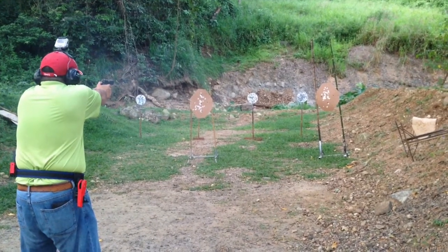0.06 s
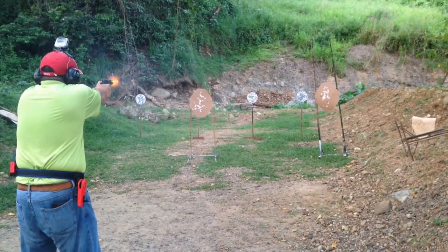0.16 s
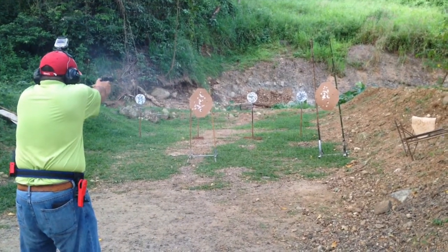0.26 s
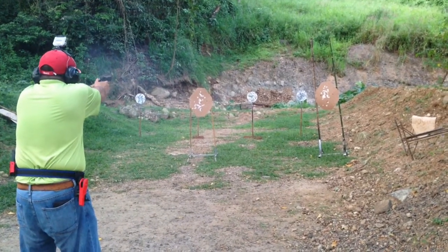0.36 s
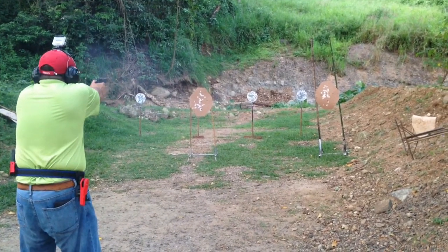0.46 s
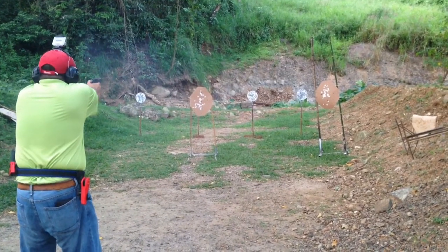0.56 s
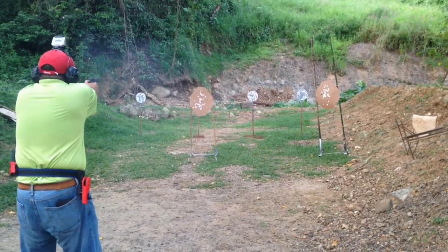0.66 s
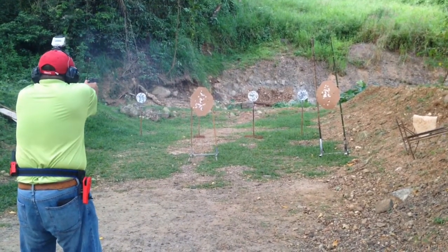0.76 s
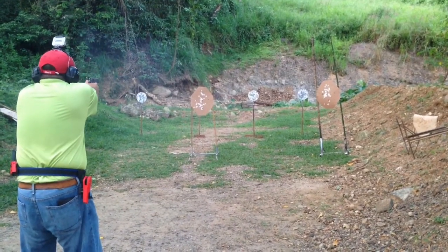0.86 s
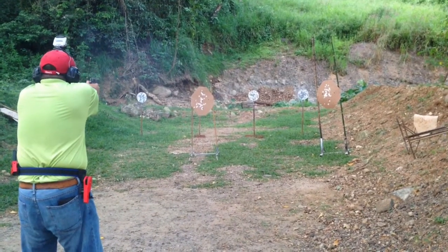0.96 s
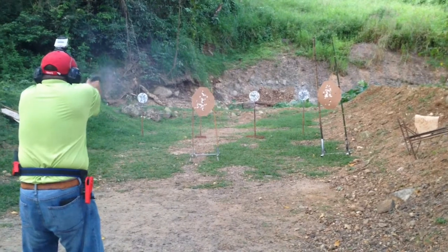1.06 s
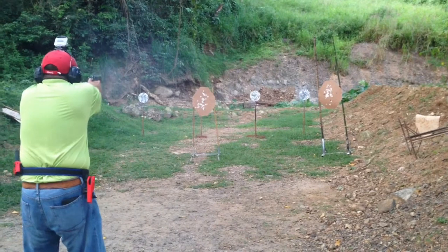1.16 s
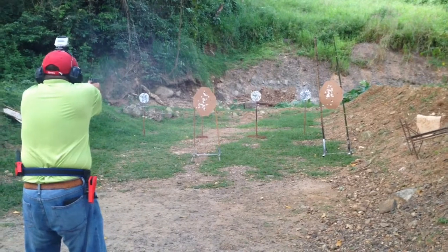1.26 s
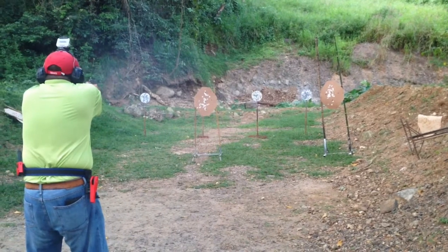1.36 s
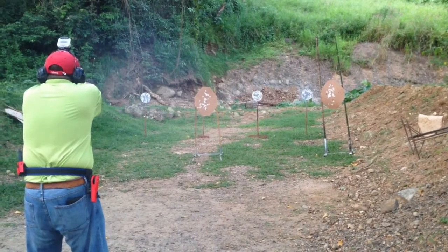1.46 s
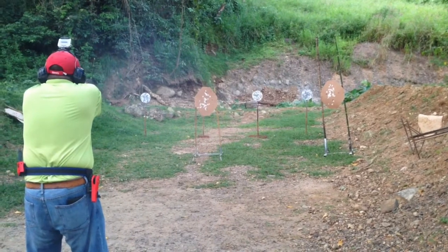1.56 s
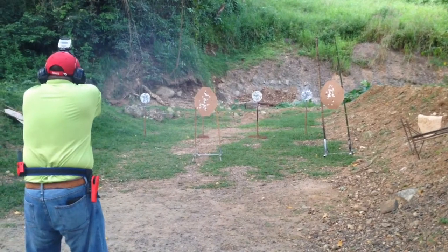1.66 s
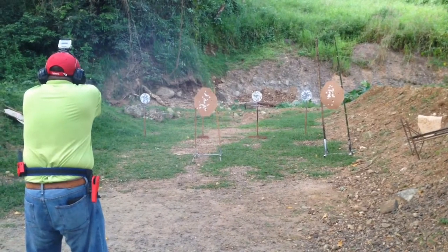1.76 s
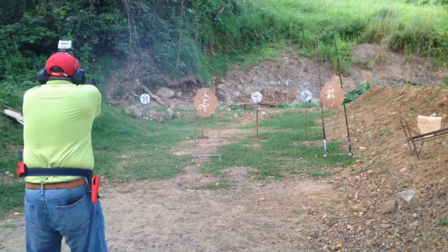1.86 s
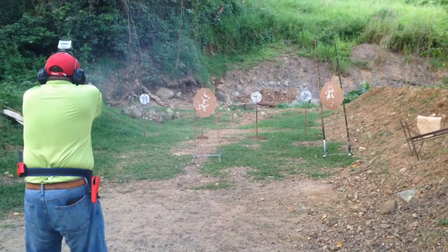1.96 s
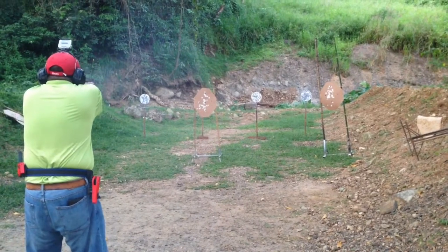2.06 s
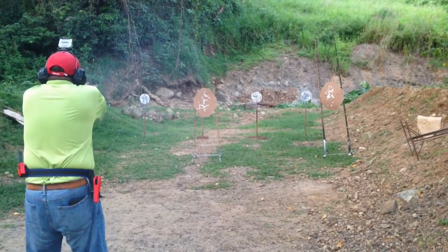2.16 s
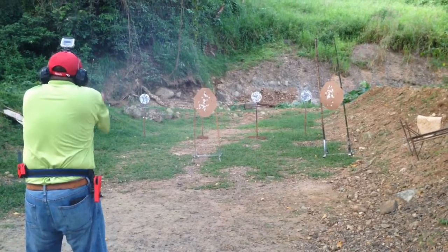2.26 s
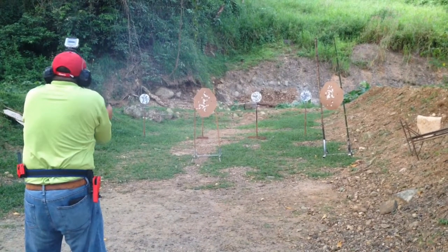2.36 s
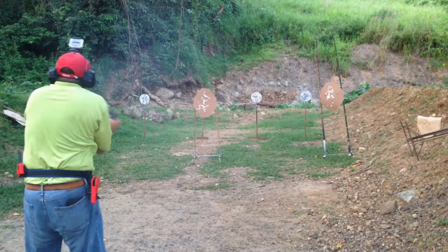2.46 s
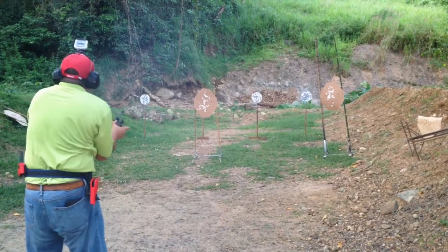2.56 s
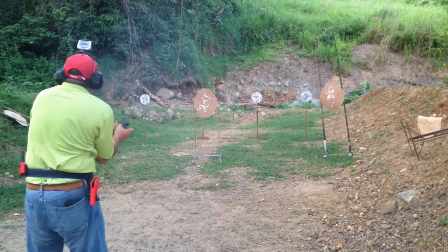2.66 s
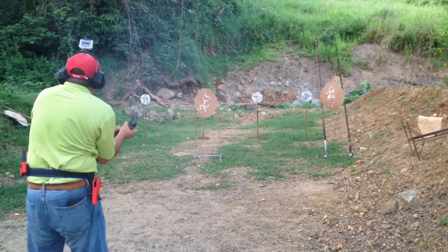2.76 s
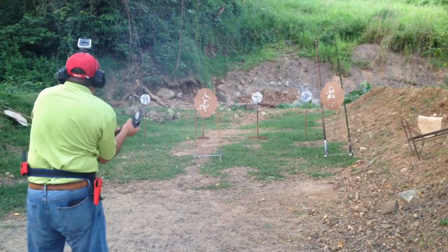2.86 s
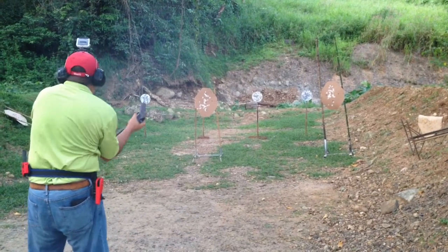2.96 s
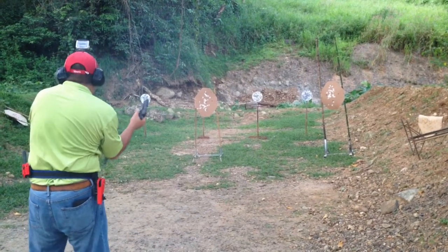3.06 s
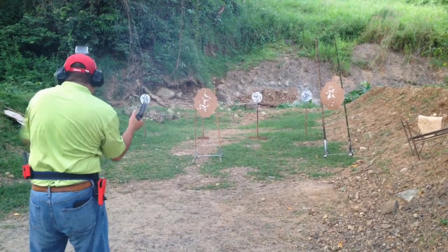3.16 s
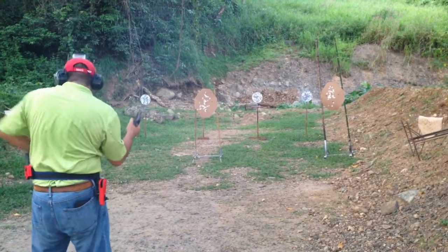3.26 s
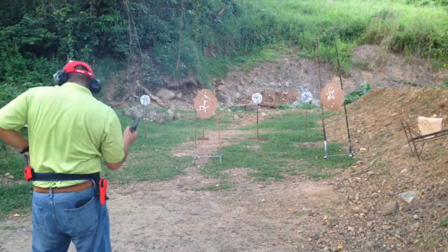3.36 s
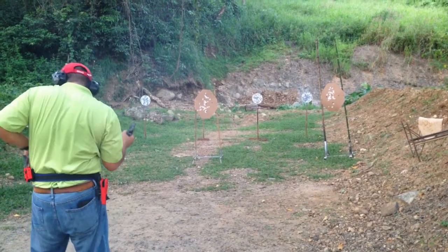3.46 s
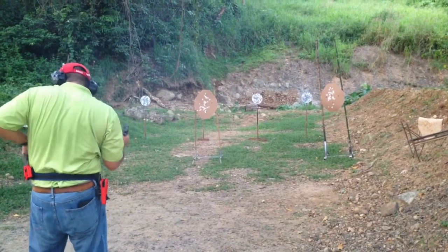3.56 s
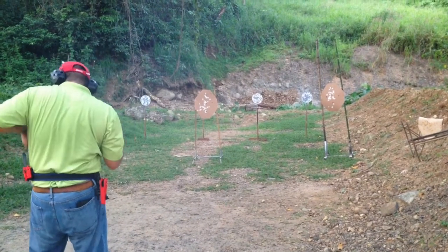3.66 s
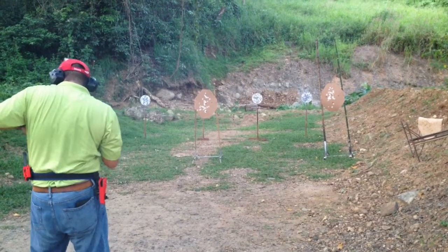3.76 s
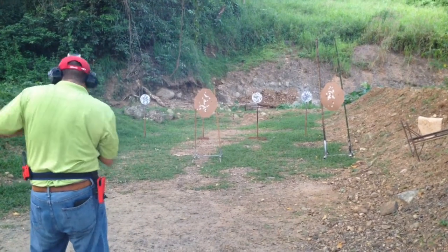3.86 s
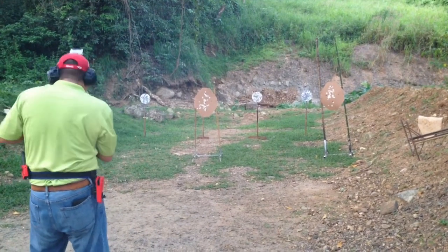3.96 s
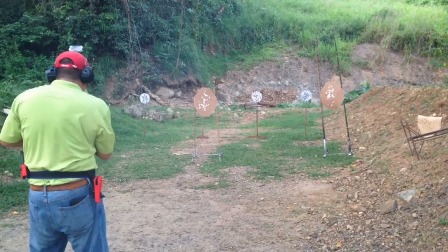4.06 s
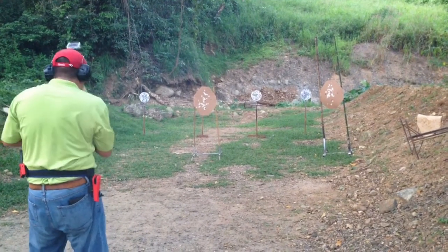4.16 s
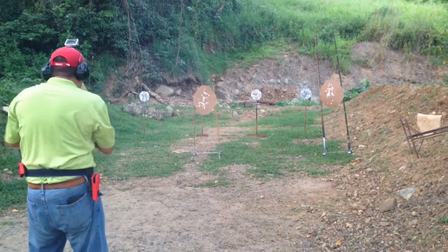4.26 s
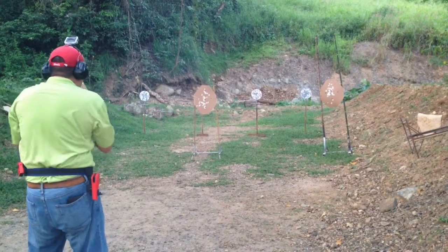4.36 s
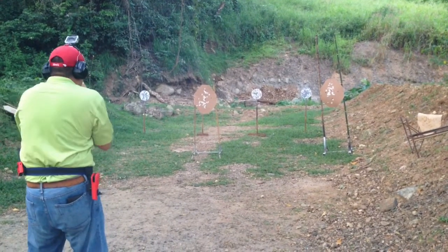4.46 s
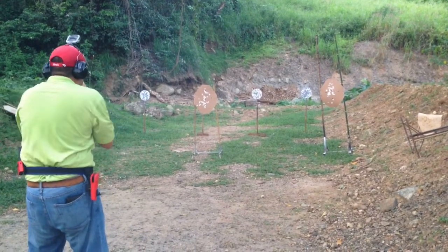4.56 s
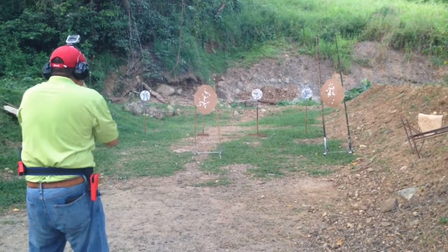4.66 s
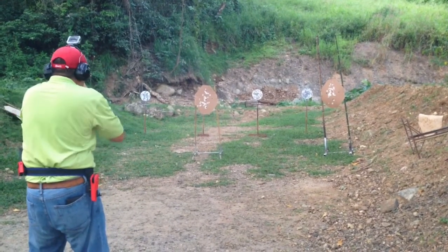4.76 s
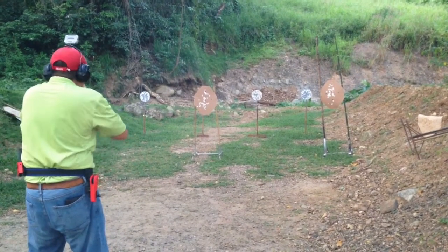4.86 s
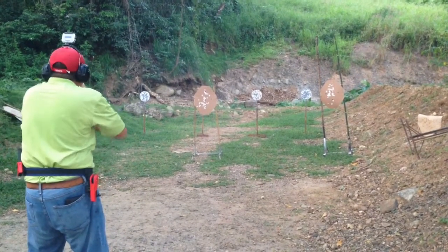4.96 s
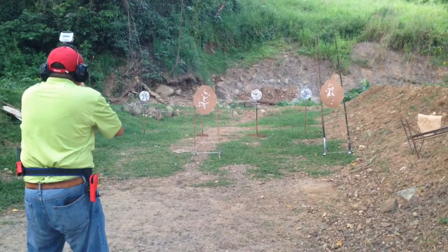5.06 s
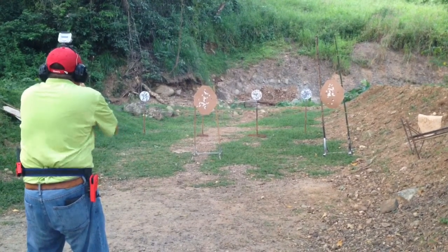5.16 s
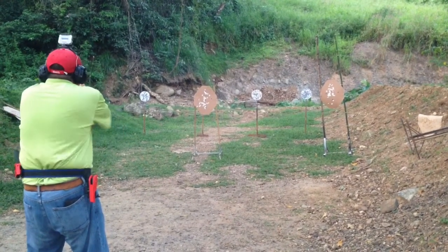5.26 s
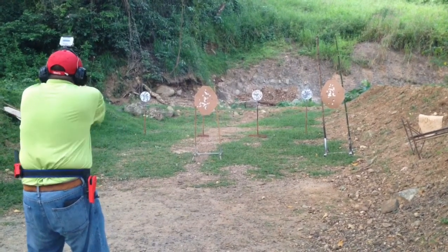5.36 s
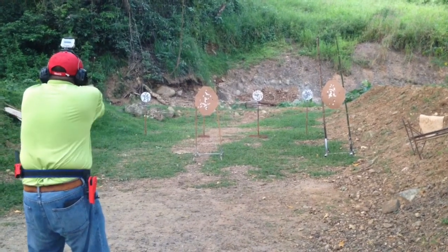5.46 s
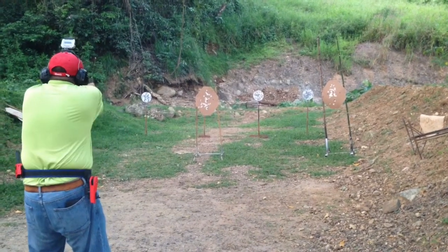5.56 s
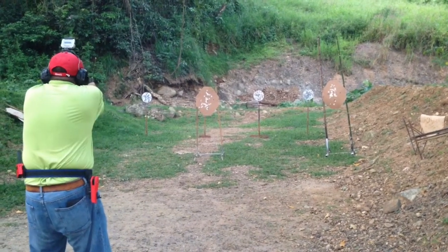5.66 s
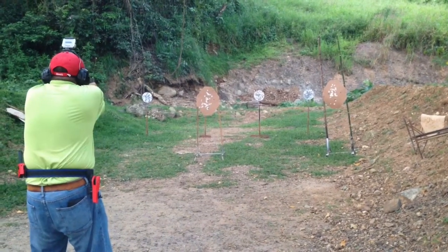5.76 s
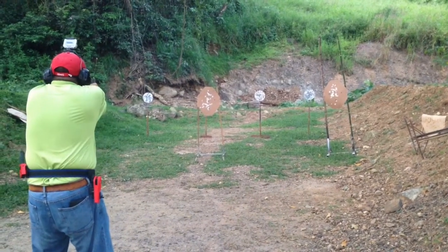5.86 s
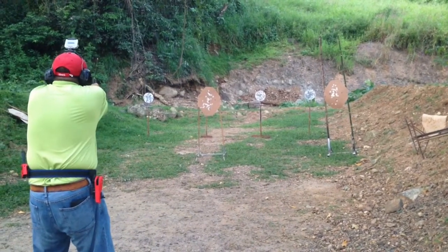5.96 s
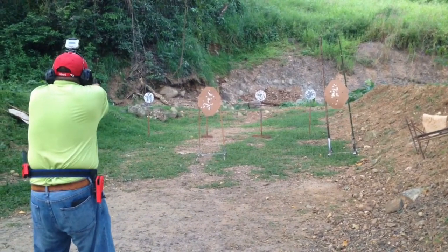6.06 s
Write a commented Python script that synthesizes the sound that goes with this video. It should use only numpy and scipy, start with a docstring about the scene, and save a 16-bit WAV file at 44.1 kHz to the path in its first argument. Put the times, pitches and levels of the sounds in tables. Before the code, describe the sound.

The fading echo of an earlier shot opens the scene, with a tiny brass tick at 0.16 s. Close, very loud pistol blasts crack at 0.24, 1.07 and 1.99 s, each followed by a dense, lumpy roll from earth banks and trees, dying over about a second. A bullet smacks a steel plate at 1.14 s, leaving a high ring; a case ticks at 1.89 s and a dull earth thud lands at 2.17 s. A very faint ricochet whine falls around 2.6 s. Cases tick and rustle on gravel from 2.83 to 3.05 s. A sharp clack at 3.46 s releases the magazine, which bounces lightly until 3.8 s. Soft handling clicks from 4.07 s lead to a firm clack at 4.48, another at 5.02, and the slide's metallic snap around 5.15 s. Background rumble, hiss and thin insect drone, ducked by shots, gradually return with paired cricket chirps until the end at about 6 s.

```python
"""An earth-banked shooting range among trees: three pistol shots at steel plates, and the tail of an earlier one.
Blasts are N-waves with noise cracks; band-filtered noise and pulse echoes form the long, lumpy answer of the banks.
Struck steel and brass are decaying sine modes, handling and landings are noise bursts, and thuds are smooth pulses.
Below lie a ricochet's falling sine, a rustle of rolling cases, paired cricket pulses and a filtered-noise background
of far rumble, hiss and insect drone, which sinks at each shot and comes back."""
import sys
import numpy as np
from scipy import signal
from scipy.io import wavfile

SR = 44100
rng = np.random.default_rng(int(sys.argv[2]) if len(sys.argv) > 2 else 0)


def nominal_scale(level):
    """Amplitude ratio for a level in decibels (scalar or array-like)."""
    x = np.asarray(level, float) / 20
    return 10 ** x


def int16_out(signal):
    """Quantize to a 16-bit WAV file."""
    q = np.round(np.clip(np.atleast_2d(signal).T, -1, 1) * 32767)
    wavfile.write(sys.argv[1], SR, q.astype(np.int16))


N = 269892


def at_hz(points, hz):
    """Spectral interpolation: every column of a table, read on a logarithmic frequency axis."""
    points = np.array(points, float)
    return [np.interp(np.log(hz), np.log(points[:, 0]), column) for column in points.T[1:]]


def bands():
    """Constant-percentage-bandwidth analysis: third-octave filters, each with its centre/Hz."""
    edges = 22 * 2 ** np.arange(0, 30 / 3, 1 / 3)
    for low, high in zip(edges, edges[1:]):
        yield np.sqrt(low * high), signal.butter(2, [low, high], "band", fs=SR, output="sos")


def coloured(spectrum, length):
    """Spectral shaping: weighted bands of white noise add up to noise of rms 1."""
    settle = 8000   # samples for the filters to settle
    white = rng.standard_normal((2, length + settle))
    out = np.zeros(length + settle)
    for k, (hz, sos) in enumerate(bands()):
        # neighbouring bands take independent noise
        out += nominal_scale(at_hz(spectrum, hz)[0]) * signal.sosfilt(sos, white[k % 2])
    out = out[settle:]
    return out / out.std()


def ring(clicks, hz, t60):
    """Damped resonance: a two-pole filter answers a unit click with a decaying sine of initial height 1."""
    radius, angle = nominal_scale(-60 / (t60 * SR)), 2 * np.pi * hz / SR
    denominator = [1, -2 * radius * np.cos(angle), radius * radius]
    return signal.lfilter([0, np.sin(angle)], denominator, clicks + 1e-18)


def add(out, s, sound):
    """Superposition: a sound is added at time s, cut at both ends of the output."""
    i = round(s * SR)
    piece = sound[max(-i, 0):len(out) - i]
    out[max(i, 0):max(i, 0) + len(piece)] += piece


def struck(times, levels_db, modes, spread_db):
    """Modal excitation: each blow drives every mode, with a random strength where spread_db is not zero."""
    out = np.zeros(N)
    chance = rng.normal(0, spread_db, (len(times), len(modes)))
    for k, (hz, level_db, t60) in enumerate(modes):
        clicks = np.zeros(N)
        clicks[np.round(times * SR).astype(int)] = nominal_scale(levels_db + level_db + chance[:, k])
        out += ring(clicks, hz, t60)
    return out


def burst(t60, spectrum):
    """Impact noise: uneven coloured noise under an exponential decay, with a peak of about 1."""
    t = np.arange(round(.12 * SR)) / SR
    steps = rng.standard_normal(len(t) // 60 + 1)
    uneven = nominal_scale(2.6 * np.repeat(steps, 60)[:len(t)])
    onset = np.minimum(t / 0.001, 1)
    return 0.46 * coloured(spectrum, len(t)) * uneven * nominal_scale(-60 * t / t60) * onset


def thump(hz, cycles):
    """Band-limited pressure pulse: a few cycles of a sine under a smooth hump."""
    t = np.arange(round(cycles * SR / hz)) / SR
    return np.hanning(len(t)) * np.sin(2 * np.pi * hz * t)


# Pistol shots, the first before the start: [t/s, echo level/dB, blast peak level/dB]
SHOTS = [(-.6, -1.5, -9), (0.2417, -0.5, -10.5), (1.068, 0, -14.5), (1.994, 0, -9.5)]


def shots(answers):
    """Muzzle blast: an N-wave and a bright crack, the crack reflected once by the ground, then the range."""
    out = np.zeros(N)
    blast = np.linspace(1, -1, round(0.00082 * SR))
    crack_spectrum = [(1000, -13.5), (3500, 3.5), (7000, -2), (15000, -9.5)]
    for (s, level_db, blast_db), answer in zip(SHOTS, answers):
        add(out, s, nominal_scale(level_db) * answer)
        add(out, s, nominal_scale(blast_db) * blast)
        for lag, crack_db in ((0, -2), (.0045, -4)):
            add(out, s + lag, nominal_scale(crack_db) * burst(0.013, crack_spectrum))
    return out


# Scatter from the range, before colouring: [delay t/s, level/dB per Hz, bass level/dB over it]
SCATTER = [(0.0, -53, -7), (0.003, -51, 10), (0.012, -52.5, -17), (0.03, -49, -10), (0.059, -51.5, -28),
           (0.075, -57, -22), (0.1, -58, 0), (0.155, -54, -2), (0.2, -57, -9), (0.25, -59.5, -9.5),
           (0.33, -62, -4), (0.46, -69, -9), (0.55, -71, -3), (0.8, -80, 0), (1.4, -97, 9.5)]
# How far each pitch follows bass and treble: [f/Hz, bass share, treble share, own level/dB]
COLOUR = [(59.34, 1.1, 0.17, -16.5), (151, 1.5, 0, -5.5), (411, 0.76, 0, 4), (850, 0, 0, 3),
          (2570, 0.085, 0.51, 1), (5980, 0.062, 0.88, -1), (11500, 0.18, 1.216, -6.5), (15500, 0, 1.5, -16)]
TAIL_DB_PER_S = 30   # decay beyond the last scatter point
# leaves scatter the treble, which dies evenly; nearby leaves add a brighter start
TREBLE_DB, TREBLE_DB_PER_S, TREBLE_MOST_UNDER_DB = -56.5, 66, 24
TREBLE_EARLY_DB, TREBLE_EARLY_S = 5.0, 0.05


def range_answer(lumpy_db):
    """Diffuse scattering: fixed ground gives each shot shared noise, while stirred air renews the treble."""
    delay, level_db, bass_db = np.transpose(SCATTER)
    t = np.arange(round(1.8 * SR)) / SR
    level = np.interp(t, delay, level_db) - TAIL_DB_PER_S * np.maximum(t - delay[-1], 0)
    lows = np.interp(t, delay, bass_db)
    treble_db = TREBLE_DB - TREBLE_DB_PER_S * t + TREBLE_EARLY_DB * np.exp(-t / TREBLE_EARLY_S)
    highs = np.maximum(treble_db - level, -TREBLE_MOST_UNDER_DB)
    settle = 4000   # samples for the filters to settle
    ground = rng.standard_normal((2, len(t) + settle))
    stirred = rng.standard_normal((2, len(SHOTS), len(t) + settle))
    lumps = rng.standard_normal((40, len(t) // 400 + 2))
    out = np.zeros((len(SHOTS), len(t)))
    unit = np.sqrt(SR / 2)   # brings white noise to 0 dB per Hz
    for k, (hz, sos) in enumerate(bands()):
        bass, treble, own_db = at_hz(COLOUR, hz)
        fresh = np.clip(hz / 4000, .3, 1)
        mixed = np.sqrt(1 - fresh ** 2) * ground[k % 2] + fresh * stirred[k % 2]
        noise = signal.sosfilt(sos, mixed)[:, settle:]
        # three neighbouring bands share their lumps
        lump = np.interp(np.arange(len(t)) / 400, np.arange(lumps.shape[1]), lumps[k // 3])
        out += unit * noise * nominal_scale(level + bass * lows + treble * highs + own_db + lumpy_db * lump)
    return out + faces(len(t), count=24)


# Clearest faces of bank and trees, the same for every shot: [delay t/s, f/Hz, peak level/dB]
ECHOES = [(0.0195, 1280, -17), (0.0381, 1300, -12), (0.0395, 850, -16), (0.0599, 850, -20),
          (0.0603, 1300, -9.5), (0.1234, 1300, -17.5), (0.1297, 544, -17.5), (0.1465, 330, -22),
          (0.1755, 220, -27), (0.1969, 570, -23), (0.204, 222, -26), (0.212, 564, -23), (0.264, 554, -23.5),
          (0.2825, 347, -27), (0.3324, 600, -27), (0.362, 200, -30), (0.4136, 500, -31), (0.4247, 340, -30),
          (0.4925, 350, -35), (0.5243, 550, -28.5), (0.5692, 850, -27), (0.5732, 1310, -31),
          (0.5732, 347, -35)]
# lesser faces at random: delays, pitches, then peak level at no delay, loss and half-range
FACE_FIRST_S, FACE_LAST_S, FACE_LOW_HZ, FACE_HIGH_HZ = 0.14, 0.8, 300, 1200
FACE_DB, FACE_DB_PER_S, FACE_SPREAD_DB = -22, 33, 3.5


def faces(length, count):
    """Discrete reflection: each face returns one dull pulse; the lesser ones weaken with delay."""
    where, pitch, size = rng.random((count, 3)).T
    delays = FACE_FIRST_S + (FACE_LAST_S - FACE_FIRST_S) * where
    pitches = FACE_LOW_HZ * (FACE_HIGH_HZ / FACE_LOW_HZ) ** pitch
    peaks = FACE_DB - FACE_DB_PER_S * delays + FACE_SPREAD_DB * (2 * size - 1)
    out = np.zeros(length)
    for s, hz, peak_db in [*ECHOES, *zip(delays, pitches, peaks)]:
        wave = nominal_scale(peak_db) * thump(hz, cycles=3.0 + hz / 300)
        add(out, s - len(wave) / SR / 2, wave)   # centred on its delay
    return out


# Bullets striking earth: [t/s, peak level/dB, f/Hz]
THUDS = [(2.166, -11, 210), (2.525, -34, 203.4), (3.091, -35, 303)]
# One bullet on a steel plate: [t/s, crack peak level/dB, ring level/dB]
PLATE_HIT = (1.1443, 5, -21)
# Modes of the plate: [f/Hz, level/dB relative to the ring level, t60/s]
PLATE = [(2097, -3, 0.75), (2077, -8, 0.4), (2160, -12, 1.0), (2320, -12, .8), (3467, -9, 0.5),
         (3537, -12, 0.4), (4457, -15, 0.5), (6099, -11, 0.5), (8565, -18, .4)]
PLATE_ECHO_DB = -8
# a tumbling bullet whines away
WHINE_S, WHINE_LENGTH_S = 2.52, 0.25
WHINE_HZ, WHINE_FALL_HZ_PER_S, WHINE_DB = 2480, 1400, -51


def bullets():
    """Impact radiation: modal ringing of a plate, pressure pulses in earth, and a ricochet's falling tone."""
    s, crack_db, ring_db = PLATE_HIT
    out = struck(np.array([s]), ring_db, PLATE, spread_db=0)
    out = out + nominal_scale(PLATE_ECHO_DB) * near_banks(out)
    crack_spectrum = [(120, -35), (600, -11), (2500, -9), (8000, -21.5), (15000, -32)]
    add(out, s, nominal_scale(crack_db) * burst(0.011, crack_spectrum))
    for s, peak_db, hz in THUDS:
        add(out, s, nominal_scale(peak_db) * thump(hz, cycles=3.16))
    t = np.arange(round(WHINE_LENGTH_S * SR)) / SR
    flutter = 1 + .5 * np.sin(2 * np.pi * 14 * t)
    whine = np.sin(2 * np.pi * np.cumsum(WHINE_HZ - WHINE_FALL_HZ_PER_S * t) / SR)
    add(out, WHINE_S, nominal_scale(WHINE_DB) * np.hanning(len(t)) * flutter * whine)
    return out


# Contacts of magazine and slide: [t/s, clatter level/dB, main f/Hz,
# treble tilt/dB per octave above 3 kHz, bass tilt/dB per octave below 3 kHz]
HANDLING = [(3.455, -17, 2040, 4, -3), (3.464, -9, 2200, -2, -6), (3.466, -16, 3700, -6, -4),
            (4.067, -36, 3105, -10, 2), (4.078, -33, 3230, -15, -.5), (4.124, -42, 3550, -6, 7),
            (4.197, -45, 1760, -10, 11), (4.234, -48, 2500, -2.5, -2), (4.448, -25, 2740, -9.5, 1),
            (4.476, -20.5, 3410, -2.5, -.5), (4.485, -12, 2340, -2.5, 2.5), (4.646, -46, 2357, -10, 5),
            (4.977, -40.5, 2035, -10.5, 1), (4.99, -27, 2400, -1, -3), (5.02, -8.5, 2500, -2, -1),
            (5.141, -24.5, 2320, -7, -2), (5.15, -17, 4790, 1.5, -4.5), (5.157, -16.5, 2430, -3.5, .5),
            (5.166, -13, 3820, 3, -2), (5.19, -28, 3700, 8.5, 1.5)]
# Clatter spectrum before tilting: [f/Hz, relative level/dB per Hz]
CLATTER = [(180, -47), (300, -17), (863, -15.5), (2100, -9.5), (3450, 1.5), (3690, 2), (4140, -7),
           (6790, -2), (15500, -9)]
# The slide rings as it shuts: [t/s, ring level/dB]
SLIDE_SLAM = (5.166, -33)
# Modes of the slide: [f/Hz, level/dB relative to the ring level, t60/s]
STEEL = [(2686, -10, 0.15), (3704, -4, 0.2), (5798, -8, 0.12), (6745, -6, 0.14), (9324, -10, 0.15),
         (10170, -10, 0.2), (10530, -8, 0.2), (10420, -9, .2), (11480, -10, 0.15)]
CLATTER_T60_S, CLATTER_S_PER_DB = 0.056, 0.0007   # harder contacts last longer
TONE_SHARE, TONE_T60_S = 0.4, 0.004


def handling():
    """Contact excitation: steel on steel and polymer gives tilted noise that drives one strong resonance."""
    s, level_db = SLIDE_SLAM
    out = struck(np.array([s]), level_db, STEEL, spread_db=0)
    hz_points, db_points = np.transpose(CLATTER)
    octaves = np.log2(hz_points / 3000)
    for s, peak_db, hz, treble_db, bass_db in HANDLING:
        tilt = treble_db * np.maximum(octaves, 0) + bass_db * np.maximum(-octaves, 0)
        t60 = np.clip(CLATTER_T60_S + CLATTER_S_PER_DB * peak_db, .005, .1)
        clatter = burst(t60, np.transpose([hz_points, db_points + tilt]))
        tone = ring(clatter, hz, TONE_T60_S)
        add(out, s, nominal_scale(peak_db) * (clatter + TONE_SHARE * tone / abs(tone).max()))
    return out


def drops(events, modes, t60, spectrum):
    """Impact of light metal: a broadband tick and unevenly driven modes."""
    s, peak_db, ring_db = np.transpose(events)
    out = struck(s, peak_db + ring_db, modes, spread_db=6.5)
    for when, level_db in zip(s, peak_db):
        add(out, when, nominal_scale(level_db) * burst(t60, spectrum))
    return out


# The empty magazine bounces: [t/s, tick peak level/dB, ring level/dB relative to the tick]
BOUNCES = [(3.505, -32, -9), (3.6112, -40, -8), (3.6282, -34, -11), (3.7184, -41, -8), (3.7615, -40, -12),
           (3.8193, -44, -7)]
# Modes of the magazine: [f/Hz, level/dB relative to the ring level, t60/s]
MAGAZINE = [(2143, -14, 0.25), (2374, -6, 0.07), (2520, -5, 0.05), (2700, -5, 0.05), (3112, -6, 0.04)]


def magazine_bounces():
    """Repeated impact: every bounce gives a noise burst and rings the magazine's modes."""
    return drops(BOUNCES, MAGAZINE, 0.042, [(1000, -4.5), (2600, 5.0), (6000, -1), (14000, -8)])


# Cases landing on gravel: [t/s, tick peak level/dB, ring level/dB relative to the tick]
CASES = [(0.1594, -44, -24), (1.8866, -24, -28.5), (2.829, -32, -38), (2.8574, -47, -29),
         (2.8923, -37, -23.5), (2.9398, -42, -22), (2.9496, -45, -22), (2.9834, -52, -22),
         (3.0154, -49, -22)]
# Modes of a brass case: [f/Hz, level/dB relative to the ring level, t60/s]
BRASS = [(7170, -5.5, 0.25), (7130, -5.5, .3), (11800, -6.5, .12)]


def cases_on_gravel():
    """Modal radiation of a small shell: a short tick and a thin brass ring."""
    return drops(CASES, BRASS, 0.01, [(2000, -26.5), (5500, 11.5), (9000, -11.5), (14000, 1)])


NEAR_RISE_S, NEAR_SAG_DB_PER_S, NEAR_LAST_S, NEAR_END_S = 0.022, 90, 0.07, 0.009
NEAR_LATE_DB, NEAR_LATE_T60_S = -8.5, 0.65


def near_banks(x):
    """Reverberation by convolution: scatter swells, sags until the last bank answers, then lingers faintly."""
    t = np.arange(0, .45, 1 / SR)
    banks = nominal_scale(-NEAR_SAG_DB_PER_S * t) / (1 + np.exp((t - NEAR_LAST_S) / NEAR_END_S))
    late = nominal_scale(NEAR_LATE_DB - 60 * t / NEAR_LATE_T60_S)
    shape = np.minimum(t / NEAR_RISE_S, 1) ** 2 * (banks + late)
    tail = coloured([(300, -9.5), (3000, -2), (8000, 1.5), (15000, -2.5)], len(t)) * shape
    return signal.fftconvolve(x, tail / np.sqrt(np.sum(tail ** 2)))[:N]   # unit energy


ROLL_S, ROLL_LENGTH_S, ROLL_FADE_S, ROLL_DB = 2.875, 0.17, 0.025, -60


def rolling():
    """Granular friction: cases rolling in gravel give a short rustle of noise with a stepped random level."""
    t = np.arange(0, ROLL_LENGTH_S, 1 / SR)
    steps = rng.standard_normal(len(t) // 200 + 1)
    grit = nominal_scale(3.7 * np.repeat(steps, 200)[:len(t)])
    shape = np.clip(np.minimum(t, ROLL_LENGTH_S - t) / ROLL_FADE_S, 0, 1) ** 2
    spectrum = [(1200, -11), (2300, 7), (4000, -13), (6000, 3), (8000, -7.5), (15000, -16)]
    out = np.zeros(N)
    add(out, ROLL_S, grit * shape * nominal_scale(ROLL_DB) * coloured(spectrum, len(t)))
    return out


# Runs of cricket chirps: [first t/s, run length/s, mean pulse peak level/dB]
CHIRP_RUNS = [(2.902, .03, -62), (2.994, .22, -59), (3.276, .07, -59), (3.41, .03, -60),
              (3.697, .25, -58.5), (4.004, .07, -59.5), (4.11, .07, -56), (4.219, .03, -58.5),
              (4.294, .12, -56.5), (4.635, .07, -56.5), (4.767, .21, -56.5), (5.302, .115, -55.5),
              (5.483, .115, -57), (5.668, .115, -55.5), (5.85, .16, -55), (6.082, .03, -53.5)]
CHIRP_EVERY_S = 0.0478


def crickets():
    """Frequency-modulated pulses: evenly spaced chirps, each of two tones that slide down in pitch."""
    out = np.zeros(N)
    t = np.arange(round(0.01 * SR)) / SR
    chance = rng.standard_normal((len(CHIRP_RUNS), 8, 2))
    for (first, length, peak_db), run in zip(CHIRP_RUNS, chance):
        for s, slips in zip(first + np.arange(0, length, CHIRP_EVERY_S), run):
            for lag, slip in zip((0, .0125), slips):
                hz = 5600 + 40 * slip - 90000 * t
                pulse = np.hanning(len(t)) * np.sin(2 * np.pi * np.cumsum(hz) / SR)
                add(out, s + lag, nominal_scale(peak_db + 1.5 * slip) * pulse)
    return out


# Spectrum of far rumble and hiss: [f/Hz, relative level/dB per Hz]
AIR = [(15, -31), (25, -13.5), (48, -5), (144, 0), (274, -6.5), (368, -10), (399, -18.5), (482, -17.5),
       (871, -24.5), (2920, -32.5), (5140, -24), (5880, -33.5), (7500, -29.5), (15500, -35)]
AIR_DB = -54.5   # rms before sinking, as is the drone's
DRONE_HZ, DRONE_WIDTH_HZ, DRONE_DB = 7550, 300, -77
SINK_DB, RECOVER_S = -33.5, 0.49


def background():
    """Stationary noise under a varying gain: rumble, hiss and insect drone sink at each shot and come back."""
    edges = [DRONE_HZ - DRONE_WIDTH_HZ / 2, DRONE_HZ + DRONE_WIDTH_HZ / 2]
    drone = signal.sosfilt(signal.butter(2, edges, "band", fs=SR, output="sos"), rng.standard_normal(N))
    t = np.arange(N) / SR
    sinks = [SINK_DB * np.exp(-np.maximum(t - s, 0) / RECOVER_S) * (t > s) for s, *levels in SHOTS]
    sink_db = np.min(sinks, axis=0)   # the deepest one holds
    return nominal_scale(sink_db) * (nominal_scale(AIR_DB) * coloured(AIR, N) + nominal_scale(DRONE_DB) * drone / drone.std())


def scene():
    """Linear superposition: all sources, with near-bank scatter of the small noises, alike in both channels."""
    near = handling() + cases_on_gravel() + magazine_bounces()
    far = shots(range_answer(lumpy_db=1.5)) + bullets()
    mono = far + near + nominal_scale(-11.5) * near_banks(near) + rolling() + crickets() + background()
    return np.array([mono, mono])


def band_limit(x):
    """A steep low-pass at the top of the band."""
    return signal.sosfilt(signal.butter(12, 16620, fs=SR, output="sos"), x)


def record(dry):
    """Saturation and band limitation: peaks are rounded, then the top is cut."""
    rounded = np.tanh(dry)
    top_cut = signal.cheby2(12, 40, 15700, fs=SR, output="sos")   # 40 dB down from 15.7 kHz
    mix = signal.sosfilt(top_cut, rounded)
    return band_limit(mix)


dry = scene()
out = record(dry)
int16_out(out)
```